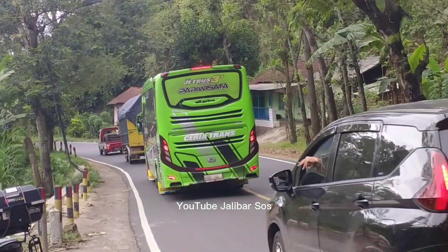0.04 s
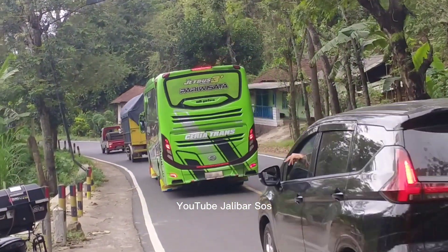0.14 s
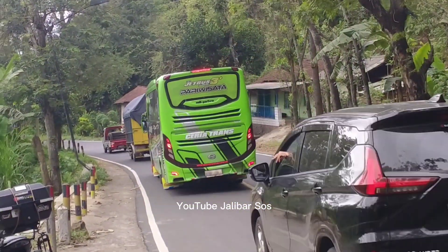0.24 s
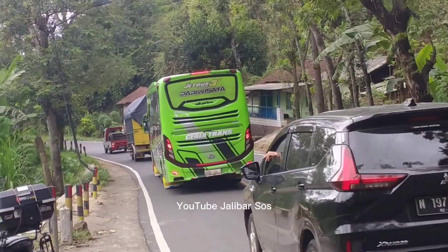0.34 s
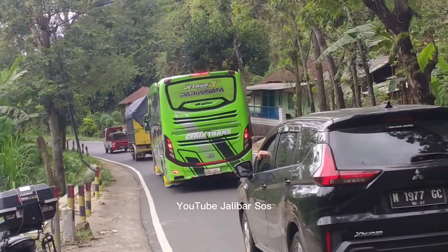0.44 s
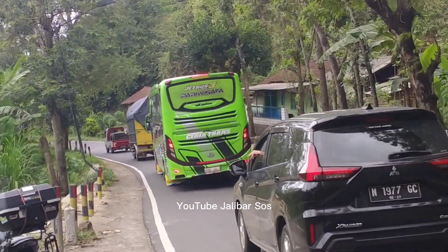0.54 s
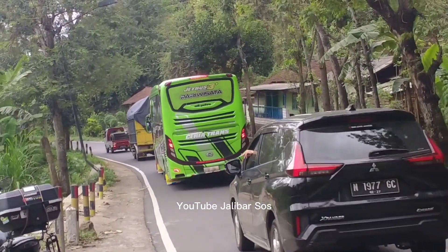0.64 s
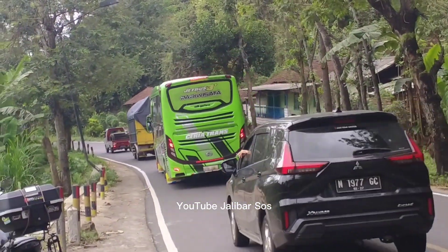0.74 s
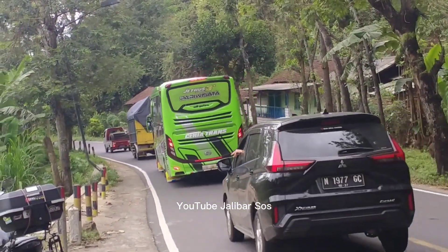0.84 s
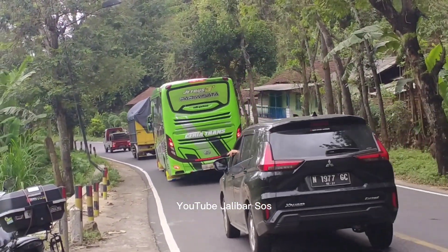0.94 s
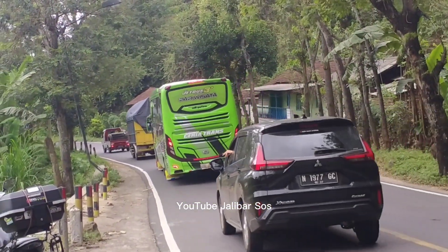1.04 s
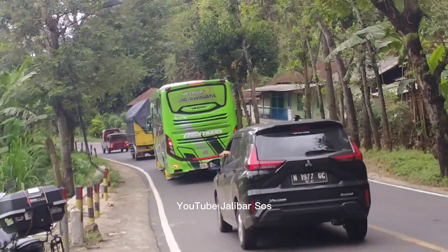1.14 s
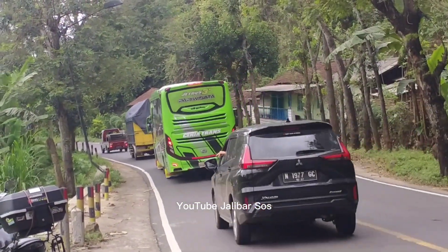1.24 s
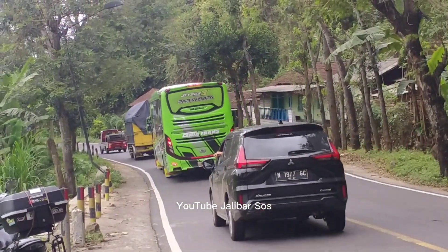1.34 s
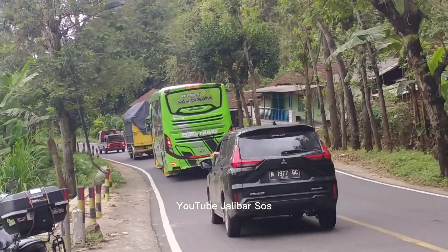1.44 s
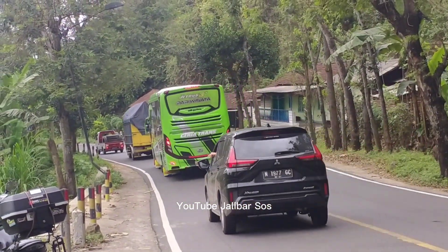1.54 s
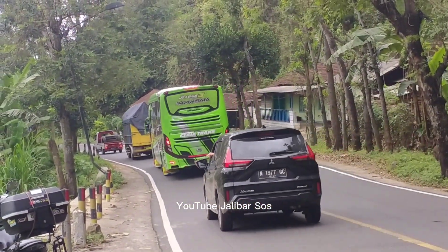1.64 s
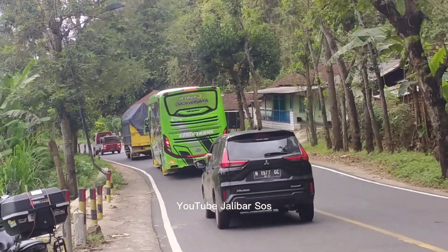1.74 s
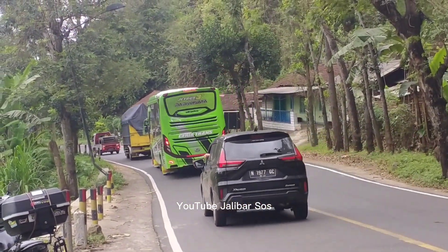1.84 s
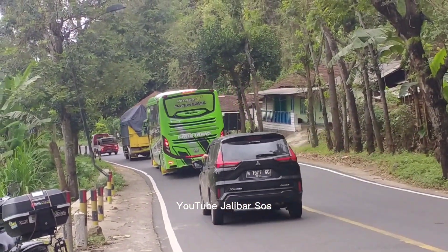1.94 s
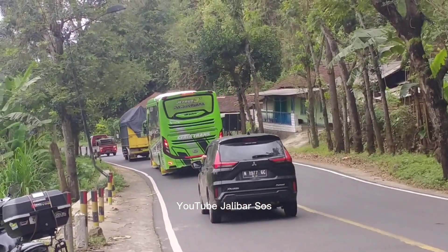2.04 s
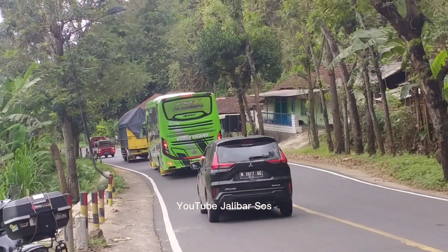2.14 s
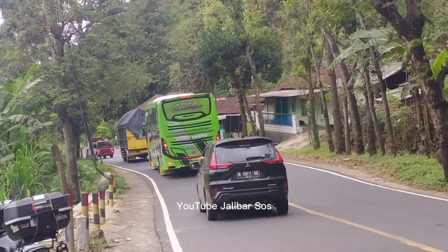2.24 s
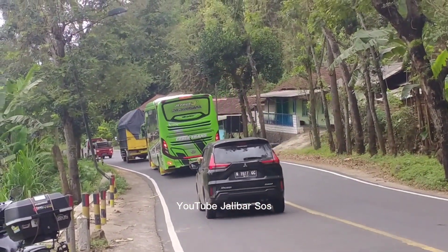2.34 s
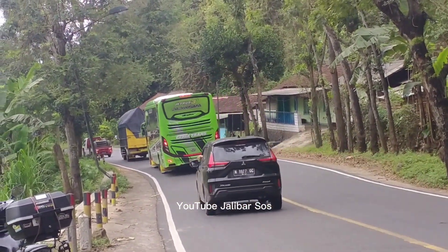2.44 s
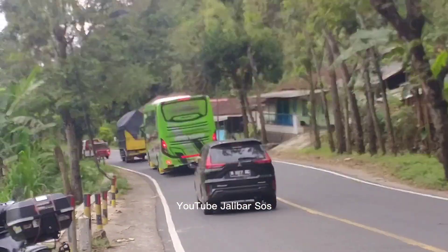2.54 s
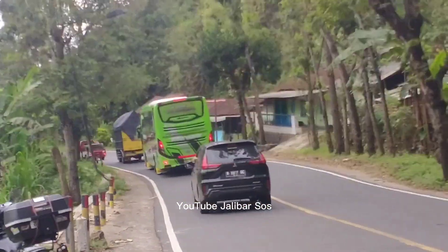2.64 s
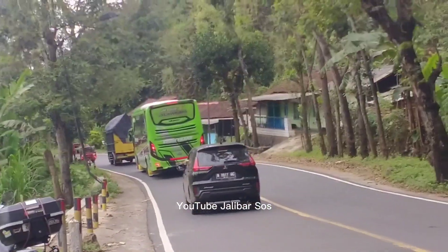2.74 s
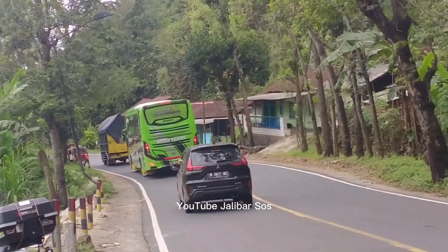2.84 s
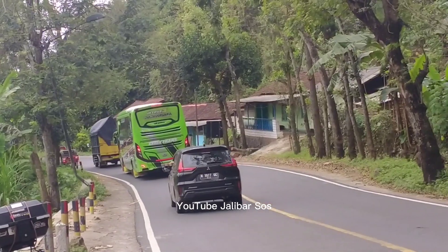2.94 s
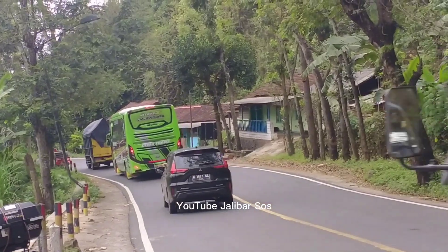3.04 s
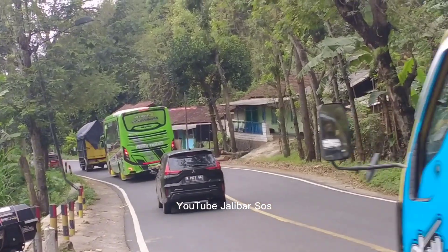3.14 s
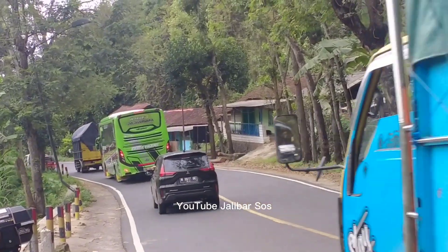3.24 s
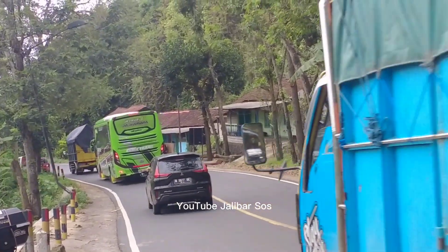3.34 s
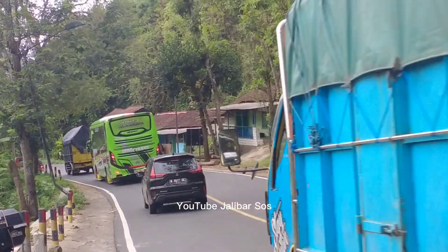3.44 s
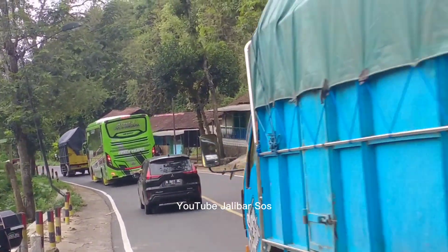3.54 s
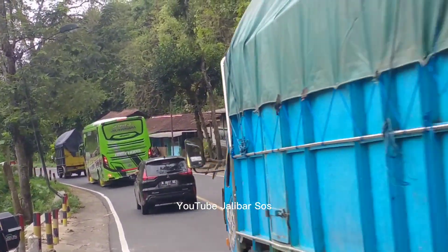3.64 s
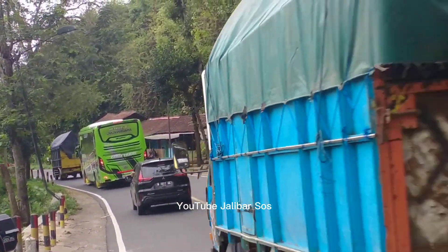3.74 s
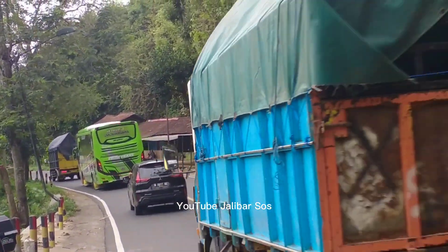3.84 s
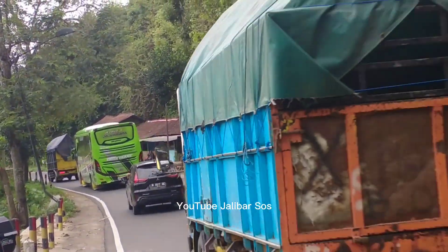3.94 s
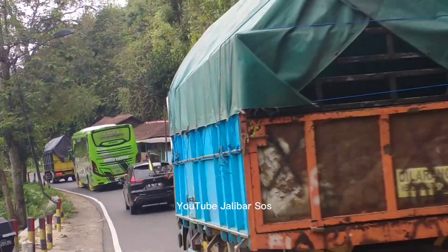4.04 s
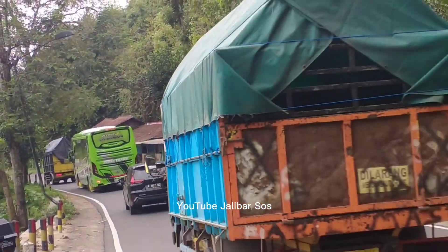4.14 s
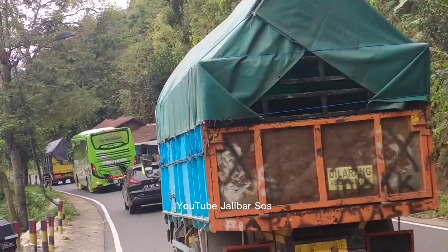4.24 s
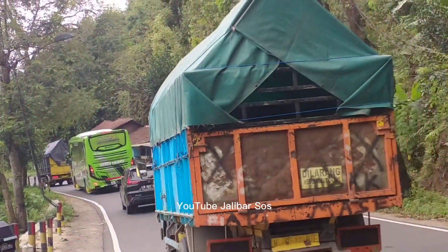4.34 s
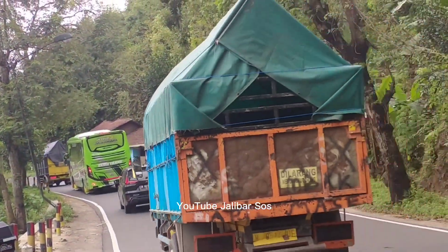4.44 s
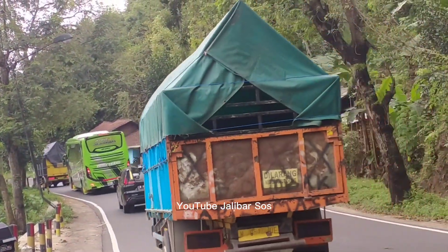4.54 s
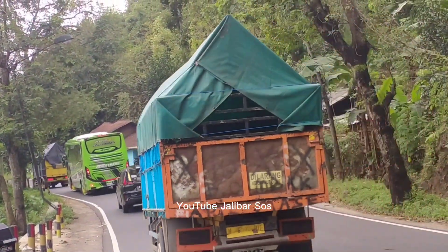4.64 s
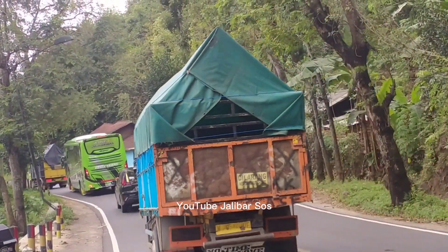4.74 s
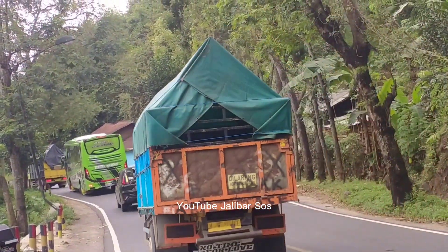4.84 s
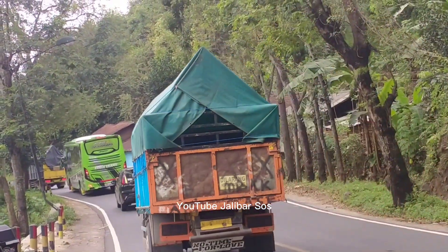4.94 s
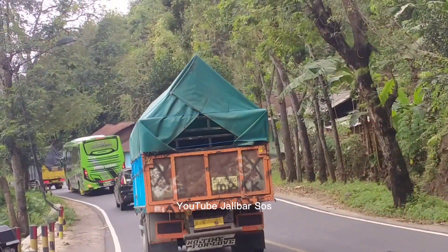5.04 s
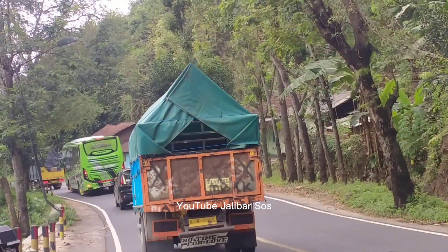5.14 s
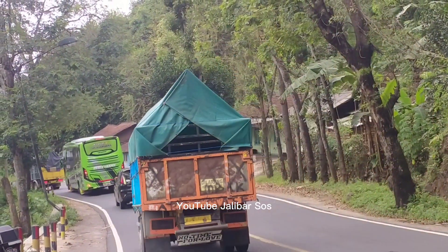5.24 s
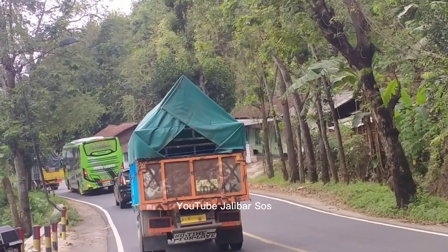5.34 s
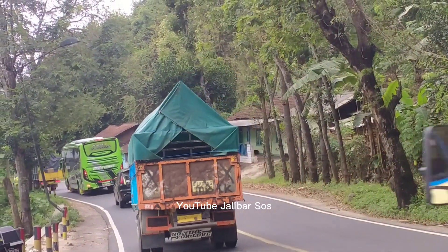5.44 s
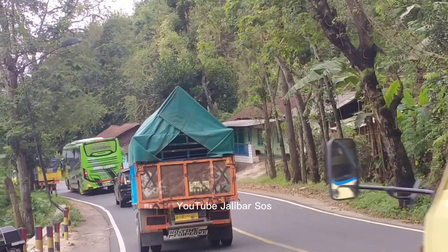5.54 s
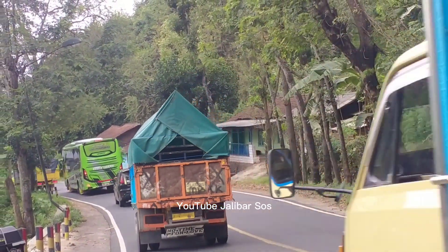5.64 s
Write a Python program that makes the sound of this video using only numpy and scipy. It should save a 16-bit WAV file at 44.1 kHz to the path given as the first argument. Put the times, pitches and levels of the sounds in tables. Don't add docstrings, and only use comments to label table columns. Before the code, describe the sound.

On a mountain road, a labouring bus recedes with faint brake squeals before one truck booms by and another approaches with an air-brake hiss.

```python
import sys
import numpy as np
from scipy import signal
from scipy.fft import rfft, irfft, next_fast_len
from scipy.io import wavfile
from scipy.ndimage import uniform_filter1d, map_coordinates

SR = 44100
rng = np.random.default_rng(int(sys.argv[2]) if len(sys.argv) > 2 else 0)


def makeup_ratio(level_db):
    decades = np.asarray(level_db, float) / 20
    return 10 ** decades


def generate_wav(sig):
    pcm = np.round(np.clip(np.atleast_2d(sig).T, -1, 1) * 32767).astype(np.int16)
    wavfile.write(sys.argv[1], SR, pcm)


N = 250488


def first_truck():
    # time in seconds, firing rate in Hz.
    speed = [(0, 69.3), (.5, 70.1), (1.15, 70.6), (1.6, 70.1), (2.4, 69.3), (2.75, 68.3), (3.17, 65.3),
             (3.6, 64.7), (4.35, 63), (5, 63)]
    # time in seconds, dB rms.
    boom = [(0, -28.5), (.11, -30), (.55, -37.5), (.93, -29.5), (1.32, -41.5), (1.45, -29), (1.76, -26.5),
            (2.0, -22), (2.42, -33.5), (2.7, -9), (3.1, -7.5), (3.19, -13), (3.3, -25.5), (3.41, -12),
            (3.63, -32), (3.96, -20.5), (4.3, -28.5), (5.0, -38)]
    # time in seconds, level in dB rms, length in seconds.
    lobes = [
        [(1.5, -50, 1.2), (2.6, -42, .25), (3.5, -59, .5)],
        [(.6, -36, 0.56), (2.05, -27, .6), (2.97, -31.5, .1), (3.9, -29.5, 0.21), (4.52, -31, .08)],
        [],
        [(0, -36.5, 0.13), (1.4, -52, 0.28), (2.65, -52, 0.17), (3.15, -29, .07), (3.55, -31, 0.088),
         (4.05, -33, 0.07), (4.85, -38, .12)],
    ]
    # time in seconds, order as a multiple of the firing rate, level in dB rms, length in seconds.
    flares = [(2.49, 9, -38, .05), (2.6, 5.5, -35, .07), (2.68, 11, -39, .05), (2.73, 8, -31.5, .06),
              (2.73, 10, -37, .05), (2.86, 4.5, -30, .07), (2.87, 5.5, -35, .06), (3.02, 5, -32, .05),
              (3.03, 9, -32, .06), (3.24, 5.5, -29, .07), (3.44, 6.5, -34, .19), (4.32, 7, -38, .06)]
    return truck(speed, boom, 3, lobes, flares, drift=.008, upper_db=-8)


def second_truck():
    # time in seconds, firing rate in Hz.
    speed = [(3.1, 74.8), (3.54, 75.2), (4.1, 74), (4.5, 72.5), (4.75, 72.3), (5, 71.4), (5.25, 70.1),
             (5.68, 67.3)]
    # time in seconds, level in dB rms.
    boom = [(3.1, -30), (3.25, -31), (3.6, -19.5), (3.95, -24.5), (4.45, -21.5), (5.19, -25.5), (5.3, -20),
            (5.52, -16), (5.68, -24.5)]
    # time in seconds, level in dB rms, length in seconds.
    lobes = [
        [(3.6, -45, .5), (5, -45, .3), (5.68, -40, 0.2)],
        [],
        [(3.75, -28, 0.29), (4.4, -30.5, .1), (5.15, -21.5, 0.3), (5.5, -24.5, 0.14)],
        [(3.8, -36, 0.17), (5.1, -20.5, 0.34), (5.6, -26, 0.14)],
    ]
    # time in seconds, order as a multiple of the firing rate, level in dB rms, length in seconds.
    flares = [(3.8, 4.5, -35, .35), (4.3, 5, -38, .4), (4.65, 10, -37, .05), (4.86, 5, -35, .07),
              (4.9, 9, -40, .05), (4.85, 5.5, -31, .16), (4.95, 8.5, -36, .07), (4.97, 4.5, -35, .08),
              (5.03, 12, -36, .04), (5.13, 11, -30, .06), (5.18, 5, -30, .06), (5.29, 10, -33, .05),
              (5.31, 6, -33, .06), (5.57, 11.5, -36, .05), (5.61, 8, -35, .05), (5.61, 9, -37, .05),
              (5.5, 5, -27, .05), (5.63, 5, -26, .06), (5.63, 12, -30, .05)]
    return truck(speed, boom, 2, lobes, flares, drift=.008, upper_db=-3)


def truck(speed, boom, boom_order, lobes, flares, drift, upper_db):
    # order as a multiple of the firing rate, level in dB under the roar.
    upper_orders = [(1.5, -14), (2.5, -14), (3.5, -14), (4.5, -12), (5, -10), (5.5, -12), (6, -11),
                    (6.5, -14), (7, -13), (8, -14), (9, -15), (10, -16), (11, -17), (12, -18), (22, -18),
                    (25, -17), (27, -17), (29, -19), (35, -20)]
    rate, = curves(speed)
    firings = np.cumsum(rate) / SR + drift * wobble(14)

    sizes = [sum(makeup_ratio(db) * swell(s, length) for s, db, length in rows) + 1e-5 for rows in lobes]
    sizes[boom_order - 1] = makeup_ratio(uniform_filter1d(curves(boom)[0], size=SR // 16))
    exhaust = np.zeros(N)
    for k, db in enumerate(20 * np.log10(sizes)):
        turns = (k + 1) * firings - .07 * k * k
        waver_db = np.clip((-8 - db) / 16, .3, 1.2) * wobble(12)
        exhaust += tone(turns, db + .3 + waver_db, scatter=.03)

    body_db = loudness()[0]
    for order, db in upper_orders:
        exhaust += tone(order * firings, body_db + upper_db + db + 2 * wobble(8))
    for s, order, db, length in flares:
        turns = order * firings + .05 * wobble(30)
        exhaust += swell(s, length) * tone(turns, db + 1 + 1.2 * wobble(20))
    return exhaust * window(speed, 0.28), firings


def roar(firings):
    # frequency in Hz, level in dB per Hz.
    block_colour = [(35, -45), (55, -24), (90, -17), (120, -5.5), (160, -1.5), (230, -4.5), (330, -5),
                    (450, -12), (600, -21.5), (900, -16), (1400, -34)]
    valve_colour = [(350, -8.5), (600, -1), (650, -3), (960, -5.5), (1320, -5), (1610, -3), (2270, -7),
                    (3480, -17.5), (4110, -25), (5000, -28), (6500, -59), (11000, -120)]
    tyre_colour = [(2060, -24), (3500, -2), (4180, -9.5), (5190, -6.5), (6700, -7.5), (7460, -4),
                   (8310, -3.5), (11500, -18), (14900, -11.5), (15600, -10), (16000, -21)]
    rumble_colour = [(20, -31), (45, -35), (60, -12.5), (90, -12), (115, 0.5), (150, -3), (200, -52)]
    body_db, clatter_db, fizz_db = loudness()
    throb = 1 + .07 * np.cos(np.pi * firings)
    body = makeup_ratio(body_db + 0.5 + 0.52 * wobble(4.7)) * rush(block_colour, patchy_db=1.5) * throb
    clatter = makeup_ratio(clatter_db - 1.26 + 0.76 * wobble(6.5)) * rush(valve_colour, patchy_db=0.84) * throb
    fizz = makeup_ratio(fizz_db + 5.5 + 0.5 * wobble(9.2)) * rush(tyre_colour, patchy_db=1)
    rumble = makeup_ratio(body_db - 13 + wobble(4)) * rush(rumble_colour, patchy_db=1.5)
    return body + clatter + fizz + rumble


def loudness():
    # time in seconds, level in dB.
    nearness = [(0, -36.5), (.6, -39), (1.1, -39.5), (1.6, -37), (2.26, -33), (2.64, -28.5), (2.85, -31.5),
                (3.1, -32), (3.25, -27.5), (3.4, -30), (3.64, -31.5), (4.12, -34), (4.5, -33), (4.8, -34),
                (5.1, -29.5), (5.4, -31), (5.58, -27.5), (5.68, -27.5)]
    # time in seconds,
    # length in seconds, change in dB.
    block_shows = [
        (2.85, 0.15, 4.5),
        (4.7, 0.34, 1),
        (5.05, .08, -3),
        (5.5, 0.43, 3.5),
    ]
    tyre_swells = [
        (0, 0.17, -2),
        (2.302, 0.13, 2),
        (2.62, 0.14, -1.5),
        (3.1, .1, 0.5),
        (4.55, .05, 2),
        (4.94, 0.15, 3.5),
        (5.37, 0.043, -1.5),
        (5.63, 0.033, -2),
    ]
    near_db = uniform_filter1d(curves(nearness)[0], size=SR // 14)
    near_db = near_db - near_db.mean()
    block_db = sum(db * swell(s, length) for s, length, db in block_shows)
    tyres_db = sum(db * swell(s, length) for s, length, db in tyre_swells)
    return -30 + 0.68 * near_db + block_db, -31 + near_db, -50 + 1.15 * near_db + tyres_db


def panels():
    # time in seconds, length in seconds, resonance in Hz, width in Hz, level in dB rms.
    ringing = [(1.9, 0.45, 1610, 70, -42), (2.48, 0.37, 1620, 330, -34), (3.2, 0.058, 920, 240, -30),
               (3.25, 0.39, 996, 220, -31.5), (3.44, 0.3, 2300, 240, -36), (5.28, 0.19, 1900, 120, -34.5),
               (5.16, 0.19, 2730, 130, -45), (4.9, .05, 14500, 1000, -51), (4.89, 0.19, 660, 520, -31),
               (4.7, .12, 1220, 380, -38), (5.45, 0.14, 580, 240, -32.5), (1.6, 0.3, 2300, 1100, -43),
               (2.47, 0.17, 1060, 270, -34), (3.42, 0.49, 320, 142, -26.5), (0.11, 0.51, 2530, 1200, -42)]
    out = np.zeros(N)
    for s, length, hz, width, db in ringing:
        shape = [(hz - 2 * width, -30), (hz - width / 2, -3), (hz, 0), (hz + width / 2, -3), (hz + 2 * width, -30)]
        shape = [(max(f, 20), v) for f, v in shape]
        out += makeup_ratio(db) * swell(s, length) * rush(shape, patchy_db=2)
    return out


def air_brake():
    # frequency in Hz, level in dB per Hz.
    nozzle_colour = [(2650, -38), (4500, -14), (5200, -19), (5710, -7), (6790, -4.5), (7650, 1),
                     (8010, 1.5), (8470, -36), (9000, -29), (11700, -42), (19800, -120)]
    puff_colour = [(880, -33), (1500, -15), (2490, 2), (2780, -7.5), (3310, -1.5), (4230, -13), (4760, -5),
                   (7730, -12), (8500, -40), (11000, -46), (18700, -120)]
    open_s, shut_s, shut_db_per_s = 4.96, 5.43, 140
    hiss_db = ridge(-29.5, shut_s, shut_s, 12, shut_db_per_s)
    hiss_db = hiss_db + ridge(0, open_s, shut_s, 70, 0)
    leak_db = ridge(-35, shut_s, shut_s, 25, shut_db_per_s)
    hiss = makeup_ratio(hiss_db - 1.5 + 1.2 * wobble(40)) * rush(nozzle_colour, patchy_db=1.4)
    flow = makeup_ratio(leak_db) + makeup_ratio(-29) * swell(5.375, .02)
    return hiss + flow * makeup_ratio(2.0 * wobble(60)) * rush(puff_colour, patchy_db=0.5)


def bus():
    start_hz, sag_hz_per_s, loudest_s, gone_s = 168.7, 10.7, 0.45, 1.7
    hz = start_hz - sag_hz_per_s * np.arange(N) / SR
    db = ridge(-31.5, loudest_s, loudest_s, 12, 12)
    return tone(np.cumsum(hz) / SR + 0.016 * wobble(8.6), db) * window([[0], [gone_s]], .3)


def squeal():
    # time in seconds, length in seconds, pitch in Hz, level in dB rms.
    cries = [
        (.11, .06, 2650, -42),
        (.33, .14, 2605, -53),
        (.59, .05, 2560, -48),
        (1.4, .1, 2610, -50),
        (1.59, .065, 2627, -45),
        (1.85, .1, 2602, -54),
    ]
    t, out = np.arange(N) / SR, np.zeros(N)
    for s, length, hz, db in cries:
        turns = hz * t + .08 * wobble(60) + .25 * wobble(12)
        out += swell(s, length) * tone(turns, db + 1 + 1.5 * wobble(25))
    return out


def grit():
    # start in seconds, peak level in dB, centre frequency in Hz.
    ticks = [(1.501, -43, 15100), (1.5269, -44, 15000), (1.8023, -43, 14700), (1.934, -43, 15100),
             (2.0014, -42, 14000), (2.2089, -38, 14300), (2.3401, -38, 15000), (2.4164, -37, 13900),
             (2.6414, -38, 13800), (3.1592, -38, 12700), (4.0287, -44, 12700), (4.5466, -36, 13600)]
    half_width_hz, rise_s = 700, .005
    out, t = np.zeros(N + SR), np.arange(SR // 20) / SR
    shape = (t / rise_s) * np.exp(1 - t / rise_s)
    for s, db, hz in ticks:
        band = [hz - half_width_hz, min(hz + half_width_hz, 15600)]
        sos = signal.butter(3, band, "band", fs=SR, output="sos")
        burst = unit(signal.sosfilt(sos, rng.standard_normal(len(t))))
        out[round(s * SR):][:len(t)] += makeup_ratio(db - 9.5) * shape * burst
    return out[:N]


def unit(x):
    return x / np.sqrt(np.mean(x ** 2) + 1e-20)


def curves(rows):
    s, *cols = np.transpose(rows)
    return [np.interp(np.arange(N) / SR, s, c) for c in cols]


def window(rows, fade):
    start, end = rows[0][0], rows[-1][0]
    return np.interp(np.arange(N) / SR, [start - fade, start, end, end + fade], [0, 1, 1, 0])


def wobble(rate):
    knots = rng.standard_normal(int(N * rate / SR) + 4)
    return map_coordinates(knots, [np.arange(N) * rate / SR])


def swell(s, length):
    return np.exp(-.5 * ((np.arange(N) / SR - s) / length) ** 2)


def ridge(db, start, end, rise_db, fall_db):
    t = np.arange(N) / SR
    return db - rise_db * np.maximum(start - t, 0) - fall_db * np.maximum(t - end, 0)


def tone(turns, db, scatter=1):
    return np.sqrt(2) * makeup_ratio(db) * np.sin(2 * np.pi * (turns + scatter * rng.random()))


def rush(spectrum, patchy_db):
    z = signal.stft(rng.standard_normal(N + 512), nperseg=512)[2]
    field = uniform_filter1d(rng.standard_normal(z.shape), 6, 0)
    field = uniform_filter1d(field, 10, 1)
    x = signal.istft(z * makeup_ratio(patchy_db * unit(field)), nperseg=512)[1][:N]
    m = next_fast_len(N + 8192)
    f, v = np.transpose(spectrum)
    log_hz = np.log(np.fft.rfftfreq(m, 1 / SR) + 1)
    gain = makeup_ratio(np.interp(log_hz, np.log(f + 1), v, left=-120, right=-120))
    return unit(irfft(rfft(x, m) * gain, m)[:N])


def scene():
    first, first_firings = first_truck()
    second, second_firings = second_truck()
    nearest = np.where(np.arange(N) < 3.6 * SR, first_firings, second_firings)
    return (first + second + roar(nearest) + panels() + air_brake() + bus() + squeal() + grit())[None]


def top_cut(x):
    return signal.sosfilt(signal.butter(12, 16590, fs=SR, output="sos"), x)


def record(dry):
    m = next_fast_len(N + 4096)
    in_band = np.fft.rfftfreq(m, 1 / SR) < 15500
    kept = irfft(rfft(dry, m) * in_band, m)[:, :N]
    return top_cut(kept)


dry = scene()
out = record(dry)
generate_wav(out)
```